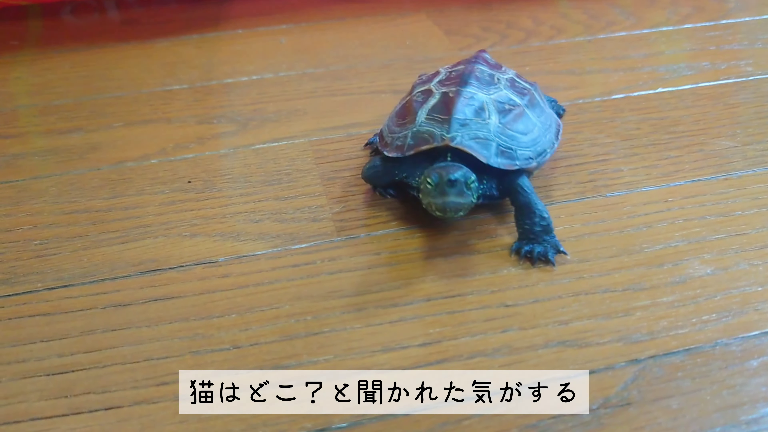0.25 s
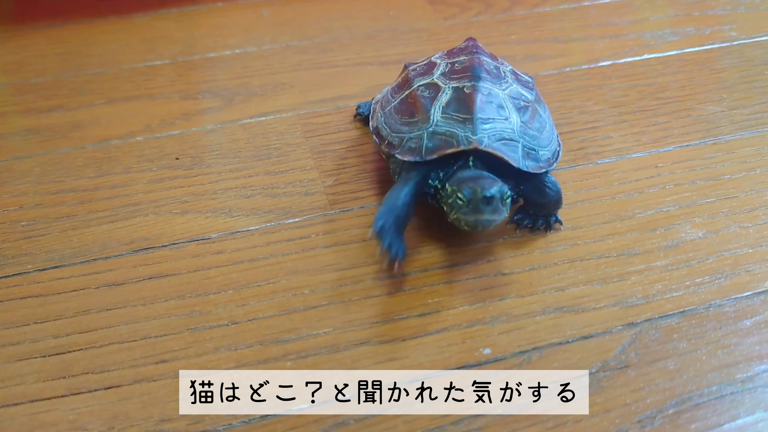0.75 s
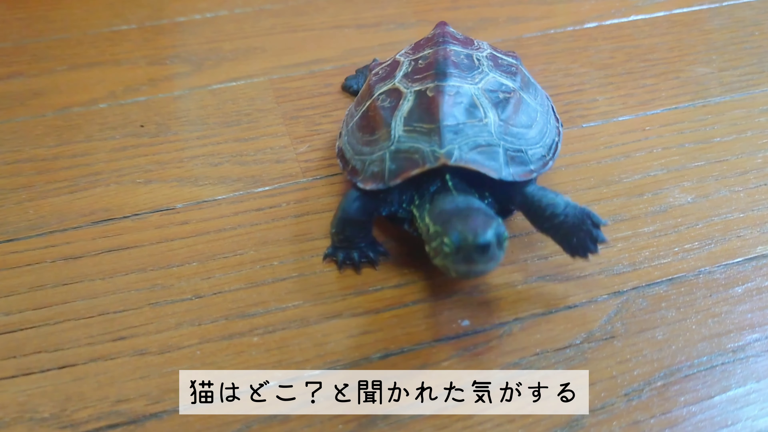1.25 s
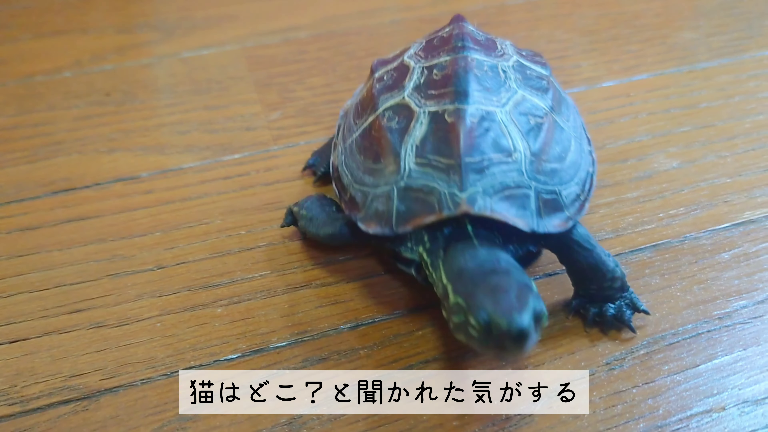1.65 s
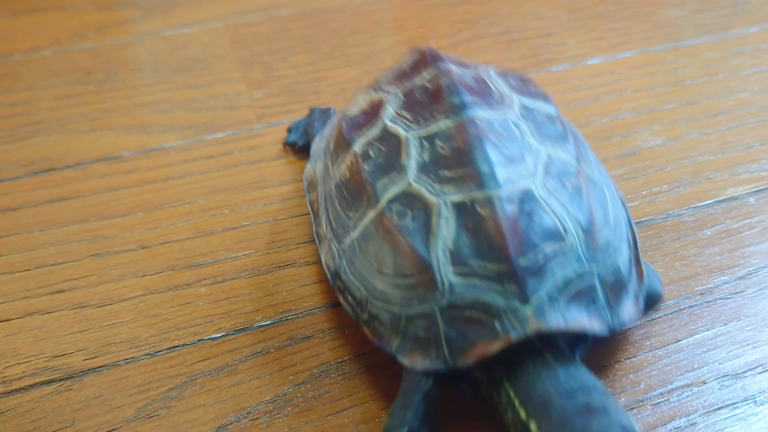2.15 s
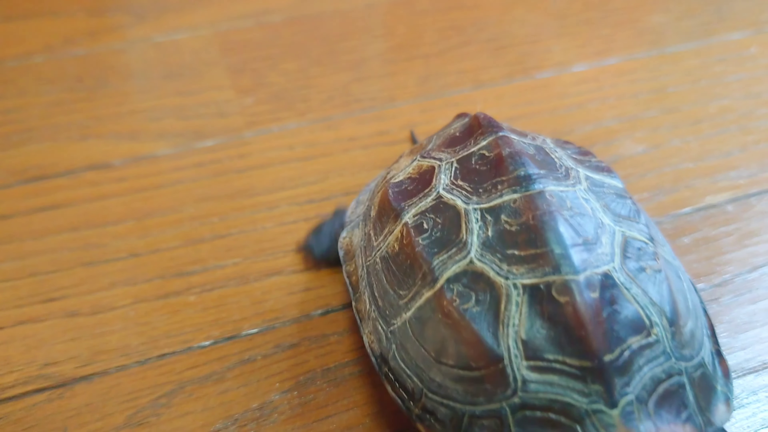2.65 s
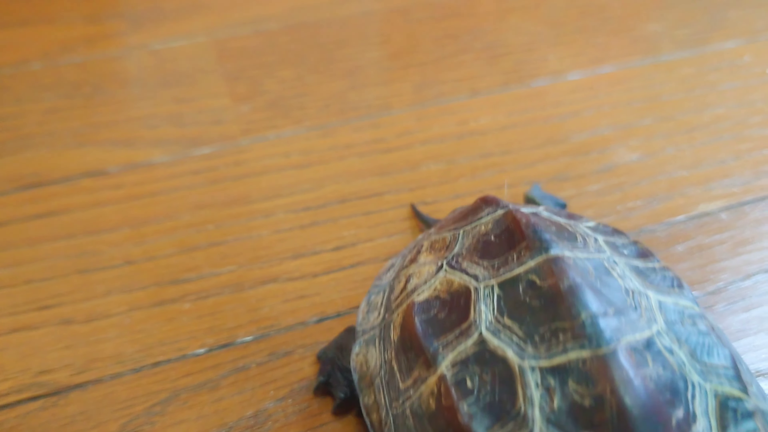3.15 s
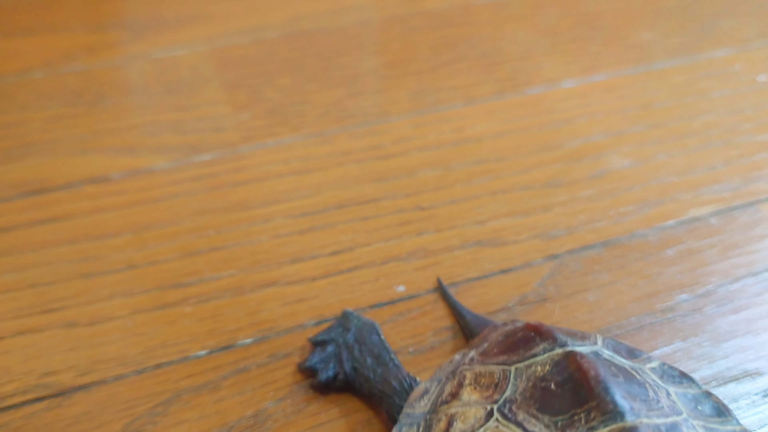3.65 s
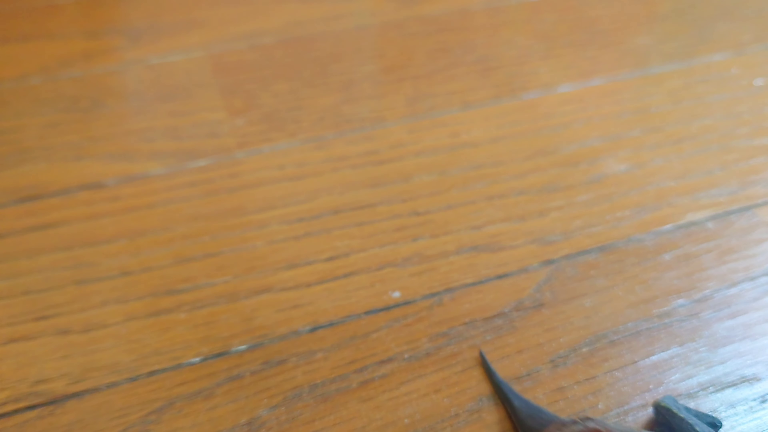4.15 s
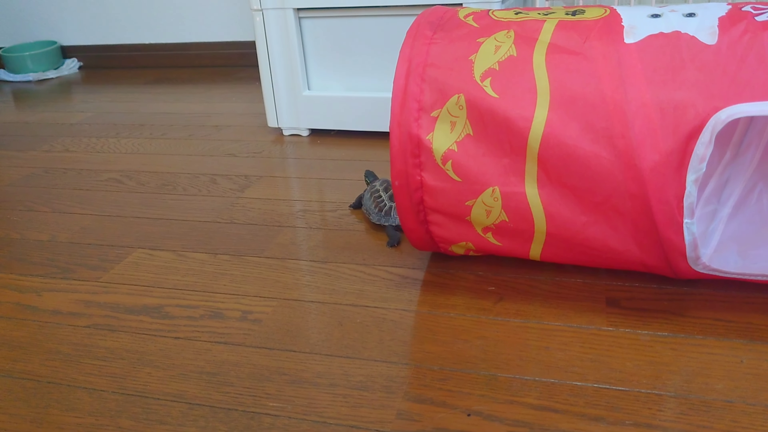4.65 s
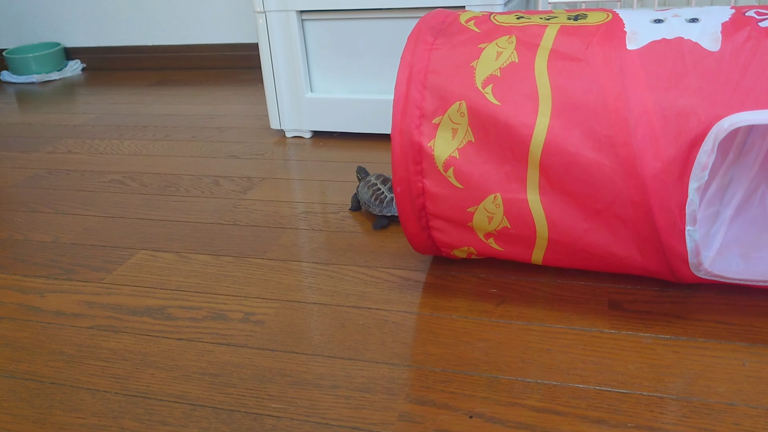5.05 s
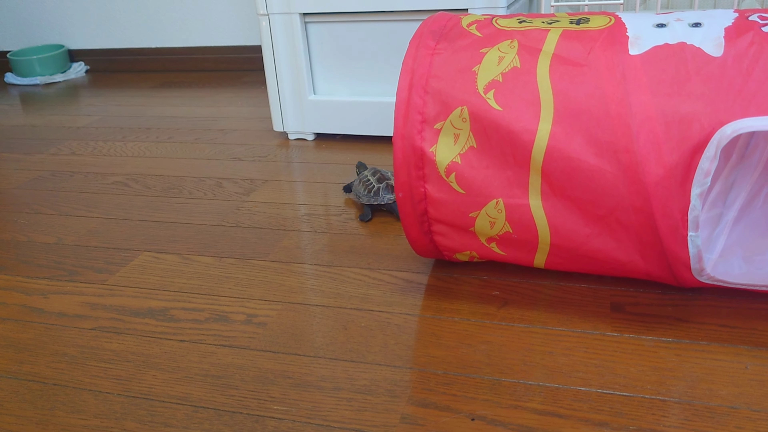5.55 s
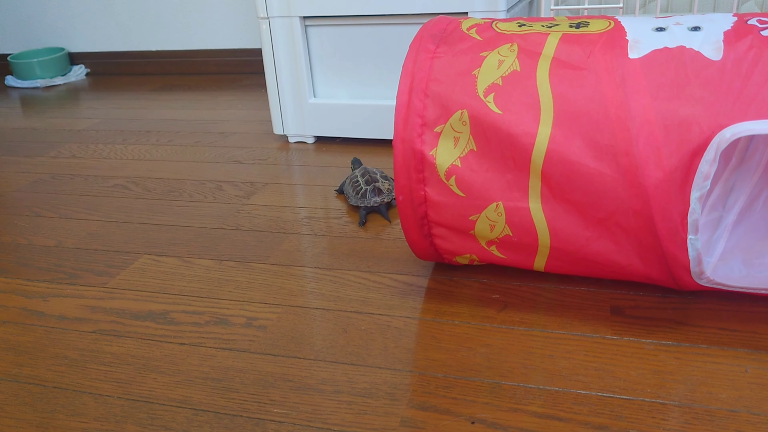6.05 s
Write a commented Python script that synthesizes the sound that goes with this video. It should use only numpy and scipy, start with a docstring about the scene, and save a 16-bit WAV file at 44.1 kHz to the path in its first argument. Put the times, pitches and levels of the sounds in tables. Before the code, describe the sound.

A quiet room with a wooden floor, in stereo with the microphone near the floor. From 0 s, faint hiss, thin narrow whistles and weak mains hum lie under a small turtle's steps: light claw scrapes and crisp dry ticks, mostly on the right. Single ticks at about 0.7 and 1.1 s, a brighter cluster at 1.7-1.9 s, then softer scratching from 2.2 to 3.4 s. At 3.55-3.7 s comes a sharp busy scrabble with short shell taps on the boards, then a few faint ticks. At 4.15 s everything drops to silence until 4.4 s. The sound returns from across the room: small ticks and weak knocks at 4.5-4.8 s, a faint electrical crackling buzz and a low throbbing drone. The loudest hollow wood knock lands at 5.4 s; duller knocks follow at 5.85 and 5.92 s, then a soft rubbing murmur around 6-6.3 s.

```python
"""Claws scrape softly, then tick: a small turtle walks over a wooden floor, close by and then across the room.
The two stretches are parted by a short silence. Claws are noise in a few resonances; the shell knocks
the boards, which ring as fading sines, and its sliding makes them murmur. Behind this are shaped noise as room
hiss, narrow whistles close by and mains hum; across the room something sparks once per mains cycle,
with a weaker spark before it, over a low drone made of two beating tones."""
import sys
import numpy as np
from scipy import signal
from scipy.fft import rfft, irfft, next_fast_len
from scipy.io import wavfile
from scipy.ndimage import uniform_filter1d, map_coordinates

SR = 44100
rng = np.random.default_rng(int(sys.argv[2]) if len(sys.argv) > 2 else 0)


def makeup_ratio(level_db):
    """Linear amplitude ratio for a level in decibels (20 dB per factor of ten)."""
    decades = np.asarray(level_db, float) / 20
    return 10 ** decades


def digitize_waveform(pressure):
    """Quantize a signal to 16-bit integers and store it at the path in sys.argv[1].

    Rows of a 2-D input are taken as channels; values are limited to [-1, 1].
    """
    field = np.atleast_2d(pressure).T
    bounded = np.clip(field, -1, 1)
    quanta = np.round(bounded * 32767).astype(np.int16)
    wavfile.write(sys.argv[1], SR, quanta)


N = 278071  # length in samples
FAR = np.arange(N) > 4.25 * SR  # true in the stretch across the room


def unit(x):
    """Scale to rms 1."""
    return x / np.sqrt(np.mean(x ** 2, -1, keepdims=True) + 1e-20)


def along(f, v, hz):
    """Values read on a log frequency axis."""
    return np.interp(np.log(hz + 1), np.log(np.add(f, 1)), v)


def wobble(rate):
    """A smooth random curve of rms 1, with rate knots a second."""
    knots = rng.standard_normal(int(N * rate / SR) + 4)
    return unit(map_coordinates(knots, [np.arange(N) * rate / SR]))


def filtered(x, response):
    """x times a complex response of frequency."""
    n = x.shape[-1]
    m = next_fast_len(2 * n if n < SR else n + SR // 2)  # zeros at the end give the ringing room
    return irfft(rfft(x, m) * response(np.fft.rfftfreq(m, 1 / SR)), m)[..., :n]


def resonance(hz, width):
    """A causal resonance, applied twice for steep sides."""
    return lambda f: (1j * f * width / (hz * hz - f * f + 1j * f * width)) ** 2


def swell(s, fade_s):
    """A gain that is 1 at s, straight in dB: 20 dB of fading take fade_s, the rise takes 0.54 of that.

    A negative fade_s turns time round: a slow rise, then a quicker fade."""
    u = (np.arange(N) / SR - s) / fade_s
    return makeup_ratio(20 * np.minimum(-u, u / 0.54))


def add(track, s, sound):
    """Mix a stereo sound in at a time."""
    track[:, round(s * SR):][:, :sound.shape[1]] += sound


# how long the room rings: f/Hz, time to fall by 60 dB/s
ROOM_RINGING = [(200, 0.42), (500, 0.22), (2000, 0.23), (5000, 0.142), (12000, 0.051)]


def echo(size):
    """A fresh stereo room tail, left energy 1: noise in which each frequency dies at its own speed."""
    hz, t, z = signal.stft(rng.standard_normal((2, size)), SR, nperseg=256)
    t60 = along(*np.transpose(ROOM_RINGING), hz)[:, None]
    tail = signal.istft(z * makeup_ratio(-60 * t / t60), SR, nperseg=256)[1]
    return np.pad(tail, [(0, 0), (250, 0)]) / np.linalg.norm(tail[0])  # starts 250 samples late


def in_room(sound, wet_db):
    """The sound and its reverberation."""
    wet = signal.fftconvolve(sound, echo(size=SR // 3), axes=1)
    wet *= makeup_ratio(wet_db)
    add(wet, 0, sound)
    return wet


# room hiss in a band of 1 Hz: f/Hz, left level/dB and right level/dB close by, then the same two across the room
HISS_LEVELS = [(25.25, -103, -105, -91, -99), (81.4, -99, -92.5, -86, -86.5), (198, -96.5, -89, -96.5, -89),
               (560, -102, -99, -99, -99), (1010, -94, -91.5, -96.5, -86), (1400, -98.5, -97.5, -99, -94.5),
               (2194, -100, -100, -109, -100), (2420, -109, -101, -111, -105),
               (3470, -120, -102, -118, -105), (3900, -114, -107, -114, -107),
               (5250, -122, -113, -123, -113), (7700, -116, -111, -115, -113),
               (10600, -124, -117, -124, -116), (14500, -128, -117, -130, -120)]
# how much both ears share: f/Hz, likeness (0 to 1)
EAR_LIKENESS = [(60, 0.38), (250, 1), (500, 0.48), (1100, 0.26), (2200, 0.11), (3500, 0.039)]


def hiss():
    """Room noise in faint patches, partly shared by both ears; the shared part reaches the right one first."""
    z = signal.stft(rng.standard_normal((2, N)), nperseg=512)[2]
    field = rng.standard_normal(z.shape[1:])
    field = uniform_filter1d(uniform_filter1d(field, 6, 0), 10, 1)
    patchy = z * makeup_ratio(2.0 * field / field.std())
    right, own = signal.istft(patchy, nperseg=512)[1][:, :N] * np.sqrt(SR / 2)

    def alike(f):
        return np.clip(along(*np.transpose(EAR_LIKENESS), f), 0, 1)

    left = filtered(right, lambda f: alike(f) * np.exp(-2j * np.pi * f * 0.00043))  # 0.43 ms late
    left = left + filtered(own, lambda f: np.sqrt(1 - alike(f) ** 2))
    both = np.array([left, right])
    hz, *db = np.transpose(HISS_LEVELS)
    near = filtered(both, lambda f: makeup_ratio([along(hz, v, f) for v in db[:2]]))
    far = filtered(both, lambda f: makeup_ratio([along(hz, v, f) for v in db[2:]]))
    return np.where(FAR, far, near)


# narrow whistles in the room noise close by: f/Hz, width/Hz, left level/dB, right level/dB
WHISTLE_BANDS = [(1146, 160, -91, -75.5), (2215, 95, -75.5, -91.5), (2910, 64, -99, -82.5),
                 (3876, 80, -106, -77)]


def whistles():
    """Noise squeezed into narrow bands sounds like a whistle; partly alike in both ears."""
    air = rng.standard_normal((2, N))
    air[0] += 0.28 * air[1]
    bands = [makeup_ratio(np.c_[db]) * unit(filtered(air, resonance(hz, width))) for hz, width, *db in WHISTLE_BANDS]
    return ~FAR * sum(bands)


MAINS_HZ = 60.04
# mains hum: multiple of the mains pitch, left level/dB and right level/dB close by, then the same two far off
HUM_PARTS = [(1, -79, -85.5, -94, -94), (2, -79, -74.5, -78, -72), (3, -79.5, -67.5, -95, -72.5),
             (4, -77.5, -71, -77.5, -67), (6, -91, -78.5, -96, -92), (7, -97.5, -85.5, -79, -82.5),
             (9, -105.5, -80, -85.5, -87)]


def hum():
    """Sines at multiples of the mains pitch, wavering a little in strength and phase."""
    t = np.arange(N) / SR
    total = 0
    for multiple, *db in HUM_PARTS:
        level_db = np.where(FAR, np.c_[db[2:]], np.c_[db[:2]]) + 1.5 * wobble(14)
        phase = 0.32 * wobble(6) + rng.uniform(0, 2 * np.pi) + [[-.6], [0]]  # the left ear lags
        total = total + np.sqrt(2) * makeup_ratio(level_db) * np.sin(2 * np.pi * multiple * MAINS_HZ * t + phase)
    return total


def sparks():
    """Across the room, a fading burst of noise in each mains cycle and a weaker one 0.3 cycle before it."""
    t = np.arange(N) / SR
    spark_s = 4.8281  # moment of one of the stronger sparks

    def since(shift):
        return ((t - spark_s) * MAINS_HZ + shift) % 1 / MAINS_HZ

    gate = makeup_ratio(-60 * since(0) / .004) + makeup_ratio(-9 - 60 * since(.3) / .004)
    crackle = gate * np.sign(rng.standard_normal(N)) * makeup_ratio(1.5 * wobble(30))
    return FAR * unit(filtered(crackle, resonance(8500, 2400))) * makeup_ratio([[-89], [-77]])


# strength of the drone at the crest of its beat: t/s, level/dB
DRONE_STRENGTH = [(4.4, -90), (4.7, -67), (5.1, -64.5), (5.4, -66.5), (5.63, -59.5), (5.9, -62.5),
                  (6.1, -64.5), (6.3, -67)]


def drone():
    """Two close low tones beat: together they are one wavering tone that swells and sinks."""
    t = np.arange(N) / SR
    pitch_hz, beat_hz, beat_peak_s = 71.5, 4.25, 5.4
    tone = np.sin(2 * np.pi * pitch_hz * t + 0.7 * wobble(10))
    beating = tone * np.cos(np.pi * beat_hz * (t - beat_peak_s))
    strength = makeup_ratio(np.interp(t, *np.transpose(DRONE_STRENGTH)))
    return FAR * np.sqrt(2) * strength * beating * makeup_ratio([[-.7], [.7]])


# the boards murmur under the sliding shell: t/s, level/dB, time to fade by 20 dB/s
SLIDES = [(5.98, -68, 0.16), (6.09, -64, 0.27), (6.22, -70.5, .25)]


def slide():
    """Soft rubbing noise fills a board resonance near 460 Hz."""
    rub = unit(filtered(rng.standard_normal(N), resonance(460, 150)))
    return sum(makeup_ratio(db) * swell(s, fade_s) for s, db, fade_s in SLIDES) * rub * makeup_ratio([[-1.5], [1.5]])


# claw resonances, for drags and ticks alike: f/Hz, width/Hz, left ear level against the right/dB
# in this order: the main part (8 kHz), the top part (12 kHz) and two low parts (4 and 2.4 kHz)
CLAW_RESONANCES = [(8070, 3530, -23.5), (12100, 10000, -16), (4080, 2770, -22.5), (2400, 2420, -9)]
# claw drags: t/s of the peak, level/dB, time to fade by 20 dB/s, top part level/dB, low parts level/dB
# (part levels are added to the first level; scrape() then trims them)
CLAW_DRAGS = [(0.1, -69.5, 1.7, -11, 8), (0.313, -53, 0.06, -20, 0), (0.452, -72.5, 1.76, -16.5, 8),
              (0.692, -65, 0.2, -4, 2), (1.07, -70, 0.63, -5.5, 3.5), (1.298, -67, 0.1, -9, 5),
              (1.75, -60, 0.28, -3.5, -2), (1.814, -58.5, 0.07, 0, 10.5), (1.901, -75, 2.3, -3.5, 12),
              (2.27, -68.5, 0.3, -3, 10), (2.392, -66, 0.43, -5, 8), (2.6, -60, 0.05, 0.5, 10),
              (2.92, -67.5, -0.8, -2, 6), (2.76, -72.5, -0.1, 6.5, -2), (3.1, -67.5, 0.3, -6, 6),
              (3.361, -69, 0.9, -5, -1), (3.55, -60, 0.38, -6, 0), (3.601, -45.5, 0.1064, -1, 5.5),
              (3.69, -57, 0.07, -4.5, 10.5), (3.948, -74, 0.2, -8, -9), (4.449, -70, 0.77, -12, 12.5),
              (4.57, -63.5, 0.34, -6, 4), (5.119, -73.5, 1.6, -8, -8), (5.379, -62, 0.05, -5, 15),
              (5.815, -68, -0.05, -7, 9.5), (5.898, -81.5, -2.3, -6, 26)]


def scrape():
    """Dragging claws: dense tiny slips of uneven size ring in the claw resonances."""
    slips = rng.standard_normal((2, N)) * makeup_ratio(3.5 * wobble(400) + 1.8 * wobble(70))
    parts = [makeup_ratio([[left_db + 4.5], [0]]) * unit(filtered(slips, resonance(hz, width)))
             for hz, width, left_db in CLAW_RESONANCES]
    levels_db = np.array([(db + 2.5, db + top_db, db + low_db - 15.0, db + low_db - 10.5)
                          for _, db, _, top_db, low_db in CLAW_DRAGS])
    # the drags overlap, so their powers add up
    power = makeup_ratio(levels_db.T) ** 2 @ [swell(s, fade_s) ** 2 for s, _, fade_s, *_ in CLAW_DRAGS]
    return sum(np.sqrt(p) * part for p, part in zip(power, parts))


def faint_ticks():
    """45 rows like those of the clear ticks, at random times, denser where the dragging is strong."""
    count = 45
    dragging = sum(makeup_ratio(db) * swell(s, fade_s) for s, db, fade_s, *_ in CLAW_DRAGS)
    busy = np.cumsum(np.sqrt(dragging))
    when = np.interp(rng.random(count), busy / busy[-1], np.arange(N) / SR)
    return np.c_[when, np.tile([-59.5, -4.5, -15], (count, 1))]  # main, top and low part dB


# clear claw ticks: t/s, main part peak level/dB (right ear, before the echo),
# top part level/dB and low parts level/dB, both added to the first level
CLEAR_TICKS = [(0.3013, -56, 7.5, -10), (0.324, -49.5, 12.5, -16), (0.3298, -55.5, 16, -18),
               (0.665, -31, -0.5, -13.5), (0.9958, -45, -11, -8), (1.0754, -34, -19, -14),
               (1.128, -39, -13.5, -11.5), (1.1341, -46.5, 9, -10), (1.2464, -50.5, -5.5, -13),
               (1.296, -53, 6, -8), (1.67, -37, -2, -15.5), (1.682, -41, -2, -9), (1.7301, -27, -0.5, -6),
               (1.7369, -46, 17, -4), (1.7647, -32.5, 2.5, -5), (1.7708, -44, -4.5, 6.5),
               (1.8213, -30, 0.5, -4.5), (1.8829, -43.5, -6, -8), (2.0767, -48, -7, -7.5),
               (2.246, -39.5, 1, -7), (2.25, -41, -1, -16), (2.3367, -39, -1, -7), (2.3494, -40.5, -4, -15),
               (2.3728, -40, -9.5, -17), (2.3799, -42, 3.5, -7), (2.3885, -37, -7.5, -5),
               (2.402, -44, 1.5, -15), (2.625, -47, -2, -12), (2.884, -44, -1.5, -12),
               (2.908, -43, -6, -27), (2.9296, -47, -8.5, -19), (3.0131, -42.5, -3.5, -5),
               (3.068, -44, -3.5, -10), (3.099, -45, -5.5, -4), (3.1362, -45.5, -4, -0.5),
               (3.3585, -41.5, -6, -7), (3.3768, -49, -13, 4), (3.4486, -44.5, -0.5, -6),
               (3.5407, -25.5, -2, -12.5), (3.5447, -37, -7.5, -3), (3.5547, -33, -9, -5),
               (3.56, -45.5, -16, 3), (3.5853, -37.5, -14.5, -20), (3.591, -42.5, -16, -7.5),
               (3.5947, -37.5, -6.5, 3), (3.5997, -26, -7, -16), (3.6089, -43, -11, 8.5),
               (3.616, -47, -4, -2), (3.6377, -35.5, -3, -19), (3.6444, -37, -7, -0.5),
               (3.6503, -34.5, -6.5, -9), (3.669, -42, -2, 2.5), (3.7145, -44.5, -3.5, -13.5),
               (3.8857, -50.5, 3, -6.5), (3.912, -47, -12.5, -12.5), (4.0838, -42, -5, -16),
               (4.125, -44.5, -11, -11), (4.5059, -42.5, -12, -1), (4.5312, -33, -17, -1.5),
               (4.552, -45.5, -14, 4.5), (4.5756, -38.5, 1.5, -13), (4.5923, -39, -18, -5.5),
               (4.7646, -37, -8, -4.5), (4.9927, -44.5, -3, -3), (5.045, -47.5, -7.5, -2),
               (5.3552, -41.5, -17, -3), (5.3774, -53, -15, 19.5), (5.7358, -46, -10, -2),
               (5.8023, -53, -12, 4), (5.815, -50, -9, 6), (5.8307, -56.5, -2.5, 17)]


def ticks():
    """A tick is a very short noise burst with a weak tail in the claw resonances, mostly on the right."""
    out, t = np.zeros((2, N + SR)), np.arange(600) / SR
    onset = 1 - np.exp(-t / 0.00023)
    fading = makeup_ratio(-60 * t / 0.0018) + makeup_ratio(-16.5 - 60 * t / 0.02)
    for s, db, top_db, low_db in [*CLEAR_TICKS, *faint_ticks()]:
        snap = rng.standard_normal((2, len(t)))
        snap[0] = 0.28 * snap[1] + 1.7 * snap[0]  # the ears are partly alike
        burst = snap * onset * fading
        tick = 0
        for (hz, width, left_db), part_db in zip(CLAW_RESONANCES, (0, top_db, low_db, low_db - 4)):
            ring = filtered(burst, resonance(hz, width))
            ring = ring / abs(ring).max(1, keepdims=True)
            tick = tick + makeup_ratio([[left_db], [0]]) * makeup_ratio(db + part_db) * ring
        add(out, s - .0004, in_room(tick, wet_db=-12.5))
    return out[:, :N]


# shell knocks: t/s, peak level/dB before the echo, contact sharpness f/Hz, left against right level/dB, left lag/ms
SHELL_KNOCKS = [(0.638, -54, 500, -1, 0.096), (1.8212, -51, 2510, -9, 0.12),
                (3.5518, -28.5, 1310, 0.5, -0.29), (3.592, -43, 1200, -9, -0.21),
                (3.608, -40.5, 1800, -1, 0.053), (3.694, -49, 600, 6, 0.038), (3.706, -49, 600, -2, 0),
                (3.7192, -30, 1180, -1.5, -0.21), (3.734, -44, 500, -4, -0.037),
                (4.557, -45.5, 920, -1, 0.031), (4.695, -42, 1060, 1, -0.057),
                (5.3745, -12, 1400, -3.5, -0.083), (5.733, -53, 700, 0, -0.089),
                (5.8473, -21.5, 790, -3, -0.29), (5.8523, -25.5, 440, -2.5, -0.3),
                (5.9169, -29.5, 550, -2.5, 0.26), (5.9222, -29.5, 396, -2.5, 0.12),
                (5.966, -49, 700, 4, -0.083)]
# floor boards: f/Hz, then time to fall by 60 dB/s and level/dB struck close by, then the same two across the room
BOARD_TONES = [(235.5, 0.035, -25, 0.12, -15), (278.6, 0.042, -8, 0.079, -12),
               (349.3, 0.024, 1.5, 0.067, -8.5), (413, 0.038, -7, 0.039, 5.5),
               (455, 0.064, -12.5, 0.069, 1), (541.5, 0.011, 6.5, 0.073, -4), (730.5, 0.0097, 1, 0.044, -8),
               (913, 0.03, -9.5, 0.068, -16), (995, 0.016, -5.5, 0.13, -23.5), (1180, 0.0037, -2, 0.017, 0),
               (1498, 0.01, -6, 0.022, -6), (1740, 0.011, -4, 0.013, -0.5), (2325, 0.0042, -2, 0.017, -10),
               (3660, .008, -13.5, 0.013, -3.5), (4160, .006, -20, 0.0067, 6)]
# bending waves come late by this over the root of f/Hz: close by, across the room [s times root of Hz]
WAVE_DELAY = [0.012, 0.0353]


def knocks():
    """A blow rings the boards; treble travels faster in wood and arrives first; soft contact drops the treble."""
    out, t = np.zeros((2, N + SR)), np.arange(SR // 5) / SR
    hz, *spots = np.transpose(BOARD_TONES)[:, :, None]
    for s, db, sharp_hz, pan_db, lag_ms in SHELL_KNOCKS:
        far = int(FAR[round(s * SR)])
        t60, level_db = spots[2 * far:][:2]
        gain = makeup_ratio(level_db + rng.normal(0, 1, hz.shape)) / (1 + (hz / sharp_hz) ** 2)
        delay = WAVE_DELAY[far] / np.sqrt(hz) - WAVE_DELAY[far] / 70  # none at 4900 Hz
        ears = []
        for lag, shade_hz in ((lag_ms / 1000, 1100), (0, 9000)):  # the left ear is shaded from the treble
            u = np.maximum(t - .0005 - lag - delay, 0)  # time since each tone arrived
            ring = np.sin(2 * np.pi * hz * u) * makeup_ratio(-60 * u / t60) * (1 - np.exp(-u * hz / 0.97))
            ears.append(np.sum(gain * ring / np.sqrt(1 + (hz / shade_hz) ** 2), 0))
        ears = filtered(np.array(ears), lambda f: (1j * f / (230 + 1j * f)) ** 4)  # boards radiate no deep bass
        ears = ears / abs(np.mean(ears, 0)).max()
        blow = makeup_ratio(db + np.array([[pan_db], [-pan_db]]) / 2) * ears
        add(out, s - .0005, in_room(blow, wet_db=(-10.5, -13)[far]))
    return out[:, :N]


# steady sounds end here: f/Hz, left row and right row
TREBLE_END = [
    [14900],
    [15800],
]


def scene():
    """All sources; steady treble ends near 15 to 16 kHz, a little lower on the left, and only a trace of the
    ticks passes it."""
    steady = hiss() + whistles() + hum() + sparks() + drone() + slide() + scrape()
    steady = filtered(steady, lambda f: f < np.array(TREBLE_END))
    claws = filtered(ticks(), lambda f: np.where(f < TREBLE_END[1][0], 1, makeup_ratio(-23.5)))
    return steady + claws + knocks()


def muting():
    """Off between the two stretches, then back in a quick and a slow step of fading in."""
    t = np.arange(N) / SR
    cut_s, resume_s = 4.1545, 4.381
    since = np.maximum(t - resume_s, 0)
    fade_in = makeup_ratio(-9 * np.exp(-since / 0.009) - 7 * np.exp(-since / 0.08))  # dB steps, times in s
    return np.where(t < cut_s, 1, (since > 0) * fade_in)


# microphone ports, left and right: notch f/Hz, depth/Hz, width/Hz (depth over width is the gain at the bottom)
PORT_NOTCHES = [(6930, 210, 1400), (6850, 51, 2640)]


def port_notch(f):
    """A port resonance near 7 kHz takes a notch out of the sound at each microphone."""
    return [(c * c - f * f + 1j * f * deep) / (c * c - f * f + 1j * f * wide) for c, deep, wide in PORT_NOTCHES]


def top_cut(x):
    """Nothing passes above the cut-off."""
    return signal.sosfilt(signal.butter(12, 16820, fs=SR, output="sos"), x)


def record(dry):
    """Each microphone port has a notch near 7 kHz; the sound is muted between the two stretches."""
    heard = filtered(dry, port_notch)
    return top_cut(heard * muting())


dry = scene()
out = record(dry)
digitize_waveform(out)
```